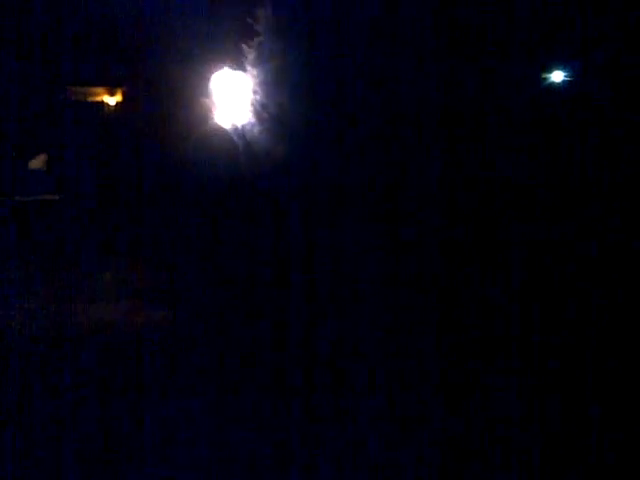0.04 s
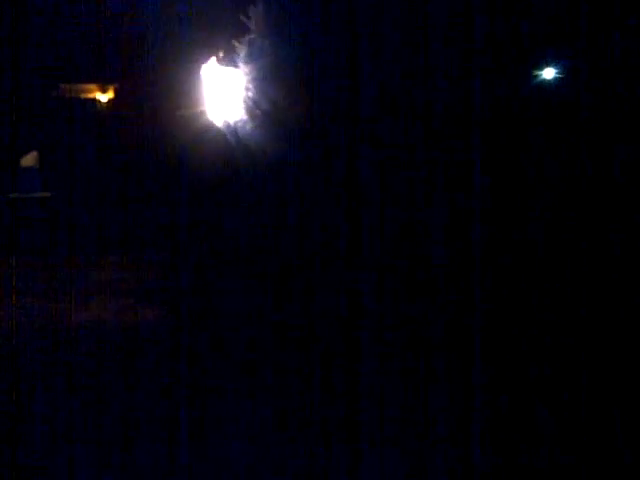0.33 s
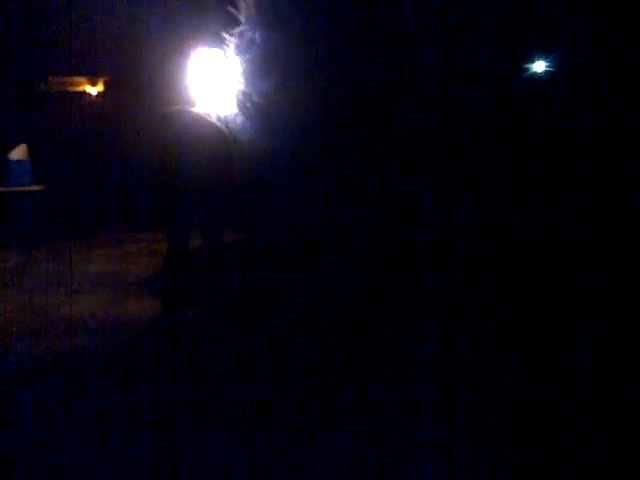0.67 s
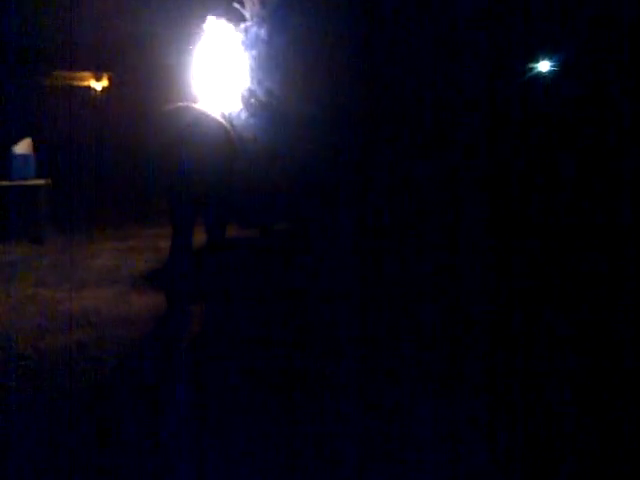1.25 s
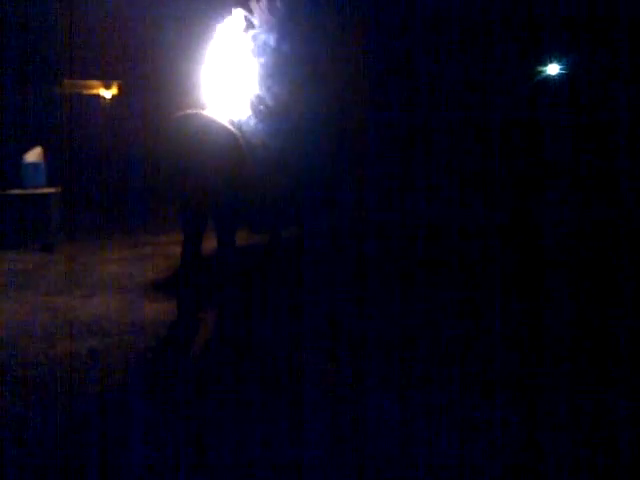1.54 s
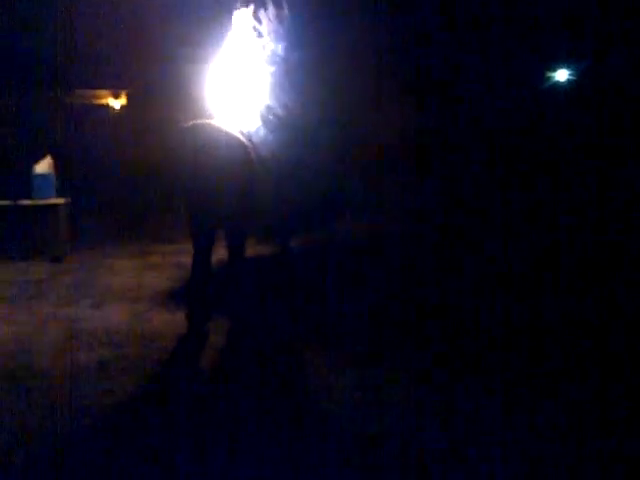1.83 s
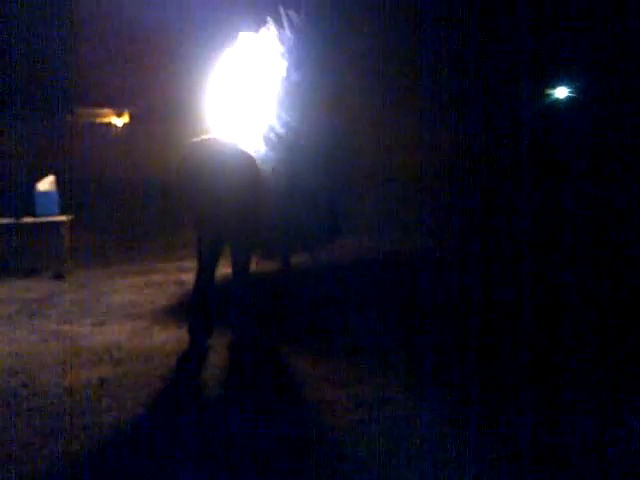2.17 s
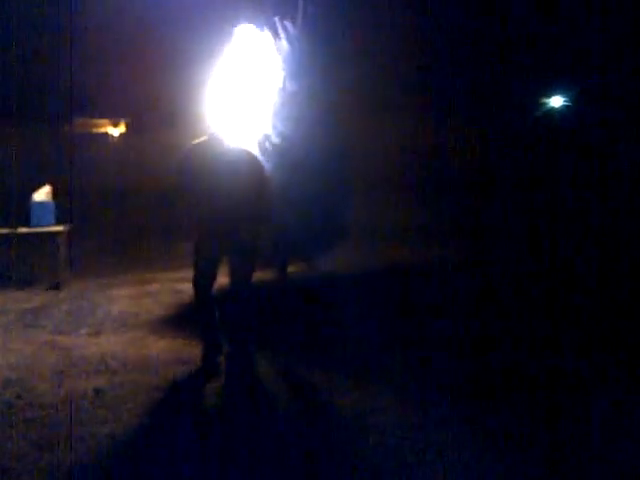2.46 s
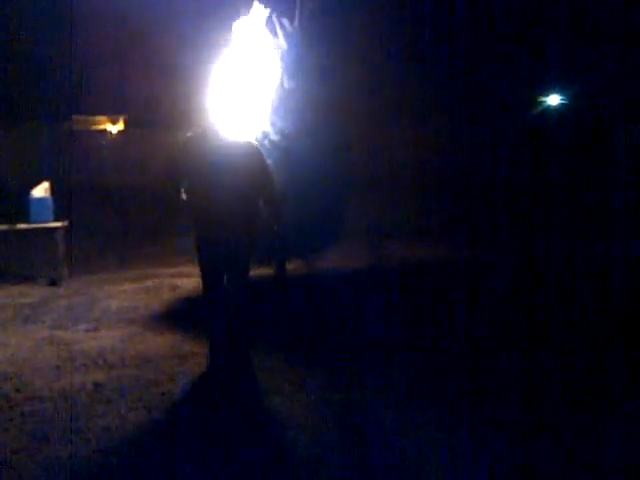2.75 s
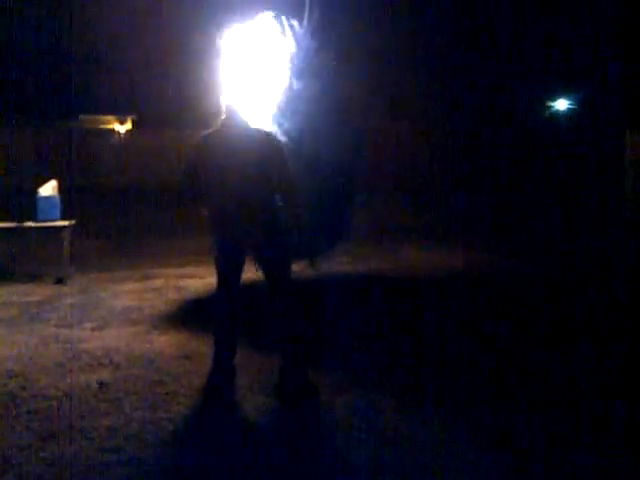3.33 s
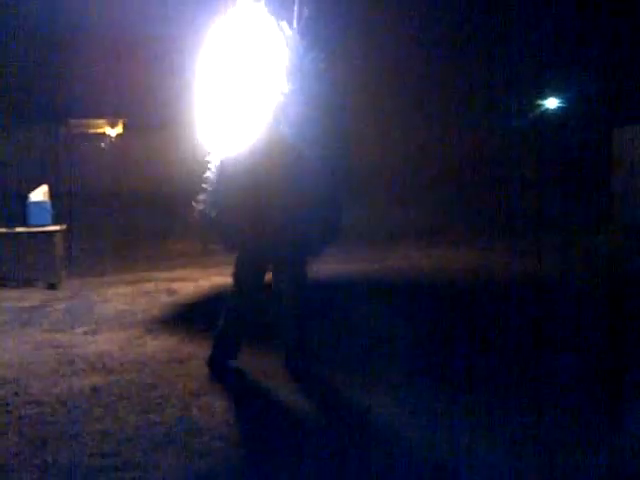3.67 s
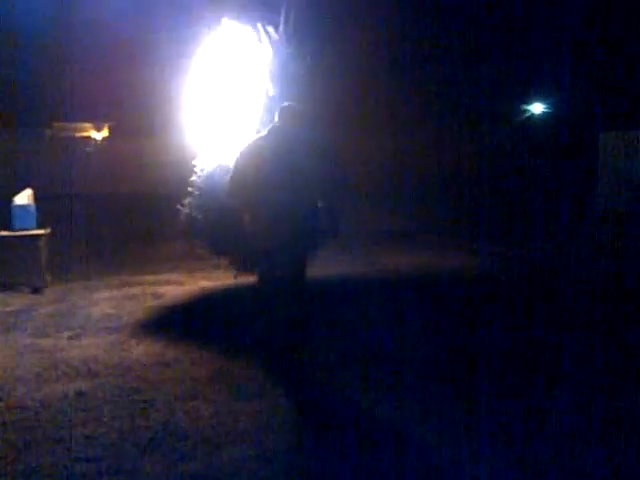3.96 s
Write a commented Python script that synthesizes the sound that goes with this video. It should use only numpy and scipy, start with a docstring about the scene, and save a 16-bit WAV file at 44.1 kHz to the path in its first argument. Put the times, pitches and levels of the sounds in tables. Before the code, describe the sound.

A large fire burns outdoors, crackling with many sharp, dry snaps over a fine sizzle that flares and sinks. The flames rush and rumble underneath, and one louder pop comes midway. A small microphone makes it sound bright.

```python
"""A large fire burns outdoors at night. Pockets in the fuel burst as sharp, dry snaps, each with a
faint scatter of echoes, over a sizzle of countless tiny ticks that flares and sinks. Underneath,
turbulent flames rush, roar, hum and rumble. A small microphone with a treble peak and a narrow band
picks it all up, directly and off the ground."""
import sys
import numpy as np
from scipy import signal
from scipy.fft import rfft, irfft, next_fast_len
from scipy.io import wavfile
from scipy.ndimage import map_coordinates

SR = 44100
rng = np.random.default_rng(int(sys.argv[2]) if len(sys.argv) > 2 else 0)


def transcribe(signal):
    """Save signal, clipped to [-1, 1], as a 16-bit WAV file at the path in sys.argv[1]."""
    frames = np.atleast_2d(signal).T
    limited = np.clip(frames, -1, 1)
    pcm = np.round(limited * 32767).astype(np.int16)
    wavfile.write(sys.argv[1], SR, pcm)


N = 176400

# Colour of one burst at the microphone. Each row: frequency in Hz, gain in dB.
BURST_EQ = [(100, -37.5), (500, -25.5), (1000, -25), (2000, -20), (2800, -15.5), (3600, -11.5),
            (4200, -12.5), (5500, -7.5), (6300, -2), (6850, -1.5), (7600, -3)]
# The shelf that gives a burst its body. Each row: frequency in Hz, share of the body gain.
BODY_SHELF = [(4000, 1), (6300, 0)]
# The sizzle flaring and sinking. Each row: time in seconds, relative level in dB.
SIZZLE_FADER = [(0, -29), (.08, -28.5), (.1, -37), (.14, -48), (.21, -27), (.29, -38.5), (.38, -42.5),
                (.56, -31), (.62, -39), (.74, -29.5), (.8, -37.5), (.93, -33.5), (.96, -35.5),
                (1.05, -30.5), (1.18, -28.5), (1.24, -32), (1.31, -24), (1.35, -28.5), (1.46, -34),
                (1.6, -26.5), (1.635, -38), (1.66, -31.5), (1.75, -28.5), (1.89, -25), (1.99, -25.5),
                (2.06, -21.5), (2.13, -24.5), (2.18, -20), (2.255, -30.5), (2.31, -26.5), (2.42, -33),
                (2.58, -24.5), (2.69, -30), (2.74, -26.5), (2.96, -31.5), (3.14, -26), (3.26, -31),
                (3.37, -28), (3.54, -28), (3.65, -23.5), (4, -32.5)]
# Colours of the hiss and of a flare's fizz. Each row: frequency in Hz, gain in dB.
HISS_EQ = [(500, -40.5), (1900, -13.5), (3200, -6.5), (4300, -7.5), (5900, -2.5), (6700, 2.5), (7500, -9)]
FIZZ_EQ = [(2000, -16), (4800, -14), (6400, 1.5)]
# Swells of the flames and of their rumble. Each row: time in seconds, relative level in dB.
FLAME_FADER = [(0, -36.5), (.06, -38.5), (.12, -46.5), (.45, -44.5), (.55, -46.5), (.74, -46), (.87, -45),
               (1.02, -42.5), (1.4, -43.5), (2.18, -40), (2.38, -45.5), (2.63, -41.5), (2.8, -46),
               (3.15, -41.5), (3.8, -42), (3.96, -48)]
RUMBLE_FADER = [(0, -34.5), (.16, -45), (.45, -41), (.55, -44), (.86, -38.5), (.95, -44), (1.12, -39),
                (1.6, -41.5), (2.25, -40.5), (3, -43), (3.25, -39), (3.72, -40.5), (3.95, -45.5)]
# Colours of the three flame layers. Each row: frequency in Hz, gain in dB.
RUSH_EQ = [(200, -22.5), (450, -9.5), (700, 3), (1050, 2), (1400, -1), (1680, -0.5), (2000, -7),
           (3000, -22.5), (7000, -16)]
ROAR_EQ = [(120, -16.5), (250, -2), (320, 1), (390, 0.5), (437, 1.5), (490, -2), (555, 0), (640, -4),
           (1000, -20.5)]
RUMBLE_EQ = [(20, -1.5), (56, -2), (98, 1.5), (108, -3), (119, 1), (140, -3.5), (200, -6), (300, -18),
             (700, -52)]
# Brief tones in the roar. Each row: centre in seconds, length in seconds, pitch in Hz, level in dB.
HUM_CUES = [(0.041, 0.11, 960, -40.5), (.02, .12, 233, -41.5), (.98, .13, 431, -43.5),
            (1.17, 0.08, 561, -41.5), (2.073, 0.079, 417, -43), (2.68, 0.37, 412.4, -54)]
# Fuel pockets bursting. Each row: time in seconds, relative level in dB, relative body in dB.
SNAP_CUES = [(0.008, -11, -5.5), (0.0195, -6.5, -9.5), (0.0306, -10, -10), (0.045, -7, -7.5),
             (0.075, -5.5, -12.5), (0.1511, -7, -16.5), (0.1933, -13.5, -11), (0.2064, -6.5, -13.5),
             (0.2218, -14, -20.5), (0.2286, -9, -14.5), (0.2671, -10.5, -10.5), (0.2774, -14.5, -8.5),
             (0.3096, -9, -8), (0.3363, -9.5, -6), (0.3612, -8.5, -11), (0.3897, -9.5, -6.5),
             (0.4019, -11.5, -11), (0.4289, -8, -10.5), (0.4345, -9.5, -5), (0.4673, -10.5, 2.5),
             (0.4767, -6, -14), (0.5045, -6, -10.5), (0.523, -9.5, -8.5), (0.5443, -10, -10),
             (0.5621, -7, -9.5), (0.5703, -7.5, -9), (0.6196, -9, -2), (0.6671, -9.5, -6.5),
             (0.6866, -9.5, -16), (0.7115, -3, -14), (0.7435, -6.5, -8.5), (0.7496, -6.5, -5.5),
             (0.771, -9.5, -8), (0.7939, -7, -14), (0.8219, -9.5, -11), (0.8481, -7.5, -7),
             (0.9021, -8.5, 1.5), (0.924, -6, -12), (0.9304, -6.5, -9), (1.0126, -8.5, -3),
             (1.04, -8, -2.5), (1.0482, -8.5, -5), (1.0518, -8, -0.5), (1.0593, -11, -12), (1.0966, -5, -7),
             (1.1264, -11, -3), (1.1799, -6, -14.5), (1.2117, -6, -10.5), (1.257, -9, -7),
             (1.276, -8.5, -12), (1.3095, -4.5, -9), (1.3214, -5.5, -15), (1.445, -9, -11),
             (1.4753, -8.5, -3.5), (1.5063, -6, -12.5), (1.5347, -7.5, -9.5), (1.549, -4.5, -8),
             (1.5806, -12.5, -9), (1.6466, -8.5, -13.5), (1.6575, -11, -4.5), (1.6683, -10.5, -5),
             (1.6874, -11, -9), (1.7095, -5, -11.5), (1.7378, -13, -12), (1.8017, -11.5, -16.5),
             (1.8112, -8.5, -13.5), (1.8327, -9, -5), (1.8955, -12.5, -19.5), (1.9, 3.5, -11.5),
             (1.9626, -6.5, -8), (2.0195, -11, -13.5), (2.0282, -7, -8), (2.0377, -12, -24.5),
             (2.0492, -8, -25.5), (2.0685, -8, -19.5), (2.0842, -8, -5.5), (2.1321, -14, -15),
             (2.1997, -10.5, -15.5), (2.2659, -4.5, -10.5), (2.3007, -10, -16), (2.3194, -7, -8),
             (2.348, -10, -6.5), (2.3571, -8, -12), (2.3733, -14, -20.5), (2.3789, -10.5, -13.5),
             (2.3902, -11.5, -16.5), (2.42, -9, -7.5), (2.4605, -8, -17), (2.4891, -7, -18),
             (2.5176, -8, -15), (2.5263, -10.5, -5.5), (2.5641, -8.5, -11), (2.5905, -10, -18),
             (2.5983, -11, -7), (2.6458, -9, -14), (2.6572, -8.5, -17), (2.7435, -6, -9.5),
             (2.8042, -10.5, -19), (2.842, -13.5, -17.5), (2.888, -9.5, -10), (2.9095, -9.5, -10),
             (2.9141, -10, -7.5), (3.0499, -9.5, -7), (3.0962, -5.5, -8.5), (3.1035, -11.5, -11),
             (3.1347, -9, -10.5), (3.3059, -6.5, -11), (3.3512, -11.5, -11), (3.3803, -3, -14),
             (3.3938, -13, -4), (3.4225, -5.5, -7.5), (3.4627, -6.5, -8), (3.5504, -12.5, -7),
             (3.5592, -11, -3), (3.5779, -12, -9.5), (3.5997, -2.5, -11), (3.645, -8, -10),
             (3.6527, -4.5, -7.5), (3.6943, -10.5, -10.5), (3.729, -9.5, -13.5), (3.7535, -8.5, -7.5),
             (3.757, -7, -5.5), (3.8259, -6.5, -15.5), (3.8573, -10.5, -21.5), (3.863, -12.5, -12),
             (3.8807, -10.5, -9), (3.908, -9, -19.5), (3.9277, -5.5, -12.5), (3.9333, -11, -10)]

TOP_HZ = 7250  # upper edge of the microphone's band
TICKS_PER_S, TICK_SPREAD_DB, TICK_CAP_DB, TICK_BODY_DB, TICK_DETUNE = 800, 9, 14, 2, 0.12
TICK_DB, HISS_DB, FIZZ_DB = 6, -6, 1.5
FLARE_DB = -27.5  # the sizzle flares above this fader level
SPUTTER_DB, SPUTTER_PER_S = 2.1, 70
RUSH_DB, ROAR_DB, RUMBLE_DB = -2, -3, -3
RUSH_FLUTTER_DB, RUMBLE_FLUTTER_DB = 1.15, 1.2
SNAP_TRIM_DB, SNAP_BODY_DB = 0.3, 8.5
SCATTER_DB, SCATTER_T60_S = -10, 0.02
SPLINTER_DB, SPLINTER_SPREAD_S = -13.5, .004
BURST_SAMPLES, RIPPLE_DB = 2048, 2.8
GROUND_DELAY_S, GROUND_DB = .00232, -17.5
CLIP_CEILING, CLIP_HARDNESS, LOWPASS_ORDER, DC_OFFSET = .9, 8, 110, .02


def amp(db):
    """Decibels to gain."""
    return 10 ** (np.asarray(db) / 20)


def unit_rms(x):
    """Scale to rms 1."""
    return x / np.sqrt(np.mean(x ** 2) + 1e-20)


def eq_at(points, hz):
    """Read an EQ curve on a log frequency axis."""
    point_hz, values = np.transpose(points)
    return np.interp(np.log(hz + 1), np.log(point_hz + 1), values)


def fader_db(rows):
    """A fader ride, one level per sample."""
    return np.interp(np.arange(N) / SR, *np.transpose(rows))


def wobble(per_s):
    """A smooth drift through per_s random values a second."""
    return map_coordinates(rng.standard_normal(int(N * per_s / SR) + 4), [np.arange(N) * per_s / SR])


def filtered(x, response):
    """Shape x with a frequency response."""
    size = next_fast_len(N + SR // 2)
    return irfft(rfft(x, size) * response(np.fft.rfftfreq(size, 1 / SR)), size)[:N]


def noise(eq):
    """Coloured noise of rms 1."""
    return unit_rms(filtered(rng.standard_normal(N), lambda hz: amp(eq_at(eq, hz))))


def burst(body_db, pitch=1, bands=14):
    """A fuel pocket pops: one sharp pressure pulse with its own chance resonances."""
    hz = np.fft.rfftfreq(BURST_SAMPLES, 1 / SR)
    ripple_db = RIPPLE_DB * np.interp(hz, np.linspace(0, TOP_HZ, bands), rng.standard_normal(bands))
    colour_db = eq_at(BURST_EQ, hz / pitch) + body_db * eq_at(BODY_SHELF, hz) + ripple_db
    # Minimum phase packs the energy into the attack.
    cepstrum = irfft(np.log(amp(colour_db)))
    cepstrum[1:BURST_SAMPLES // 2] *= 2
    cepstrum[BURST_SAMPLES // 2 + 1:] = 0
    spectrum = np.exp(rfft(cepstrum))
    in_band = irfft(spectrum * (hz < TOP_HZ))
    return irfft(spectrum) / np.abs(signal.hilbert(in_band)).max()


def sizzle(colours=12):
    """Tiny bursts sputter over a bed of hiss; in a flare they level off and a bright fizz takes over."""
    ticks = np.zeros(N)
    steps = np.linspace(-2, 1, colours)
    for body, detune in zip(steps, rng.permutation(steps)):
        triggers = rng.random(N) < TICKS_PER_S / SR / colours
        sizes = amp(np.minimum(TICK_SPREAD_DB * rng.standard_normal(N), TICK_CAP_DB))
        tick = burst(TICK_BODY_DB * body, pitch=np.exp(TICK_DETUNE * detune))
        ticks += signal.oaconvolve(triggers * sizes, tick)[:N]
    sputter = amp(SPUTTER_DB * np.minimum(wobble(SPUTTER_PER_S), 1))
    level = amp(fader_db(SIZZLE_FADER))
    tick_level = np.minimum(level, amp(FLARE_DB))
    fizz = amp(FIZZ_DB) * np.sqrt(level ** 2 - tick_level ** 2) * noise(FIZZ_EQ)
    hiss = amp(HISS_DB) * level * noise(HISS_EQ)
    return sputter * (amp(TICK_DB) * tick_level * unit_rms(ticks) + hiss + fizz)


def flames():
    """Turbulent burning gas: a fluttering rush on top, a hollow roar in the middle, a rumble below."""
    flame_db, low_db = fader_db(FLAME_FADER), fader_db(RUMBLE_FADER)
    rush = noise(RUSH_EQ) * amp(flame_db + RUSH_DB + RUSH_FLUTTER_DB * wobble(per_s=25))
    roar = noise(ROAR_EQ) * amp(flame_db + ROAR_DB)
    rumble = noise(RUMBLE_EQ) * amp(low_db + RUMBLE_DB + RUMBLE_FLUTTER_DB * wobble(per_s=12))
    return rush + roar + rumble


def hums(waver=.028):
    """Now and then a faint, wavering tone swells out of the roar and fades."""
    out, t = np.zeros(N), np.arange(N) / SR
    for centre_s, length_s, hz, db in HUM_CUES:
        swell = np.cos(np.pi * np.clip((t - centre_s) / length_s, -.5, .5))
        pitch_hz = hz * (1 + waver * wobble(per_s=120))
        out += amp(db) * swell * np.sin(2 * np.pi * np.cumsum(pitch_hz) / SR)
    return out


def snaps():
    """Loud bursts, each with small splintering cracks around it and a short tail of outdoor echoes."""
    out, t = np.zeros(N + SR), np.arange(BURST_SAMPLES) / SR
    lead = BURST_SAMPLES // 2  # room for splinters ahead of the main hit
    for time_s, db, body_db in SNAP_CUES:
        scatter = rng.standard_normal(BURST_SAMPLES) * amp(-60 * t / SCATTER_T60_S)
        impulses = np.pad(amp(SCATTER_DB) * scatter / np.linalg.norm(scatter), (lead, 0))
        splinter_offsets = np.clip(SPLINTER_SPREAD_S * SR * rng.standard_normal(3), -lead, lead)
        impulses[lead + splinter_offsets.astype(int)] += amp(SPLINTER_DB) * rng.standard_normal(3)
        impulses[lead] = 1  # the main hit
        snap = signal.fftconvolve(burst(body_db + SNAP_BODY_DB), impulses)
        out[int(time_s * SR):][:len(snap)] += amp(db + SNAP_TRIM_DB) * snap
    return out[lead:lead + N]


def scene():
    """The whole fire in mono, heard directly and once more off the ground."""
    fire = snaps() + sizzle() + flames() + hums()
    return filtered(fire, lambda hz: 1 + amp(GROUND_DB) * np.exp(-2j * np.pi * hz * GROUND_DELAY_S))[None]


def record(dry):
    """The input stage soft-clips the loudest snaps, cuts the top steeply and adds a DC offset."""
    narrow = filtered(dry[0], lambda hz: hz < TOP_HZ * 1.04)
    rounded = narrow / (1 + np.abs(narrow / CLIP_CEILING) ** CLIP_HARDNESS) ** (1 / CLIP_HARDNESS)
    lowpassed = filtered(rounded, lambda hz: 1 / np.sqrt(1 + (hz / TOP_HZ) ** (2 * LOWPASS_ORDER)))
    return lowpassed[None] + DC_OFFSET


dry = scene()
out = record(dry)
transcribe(out)
```